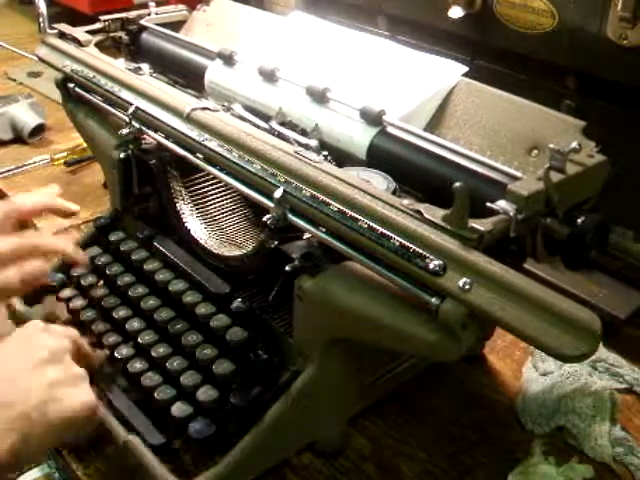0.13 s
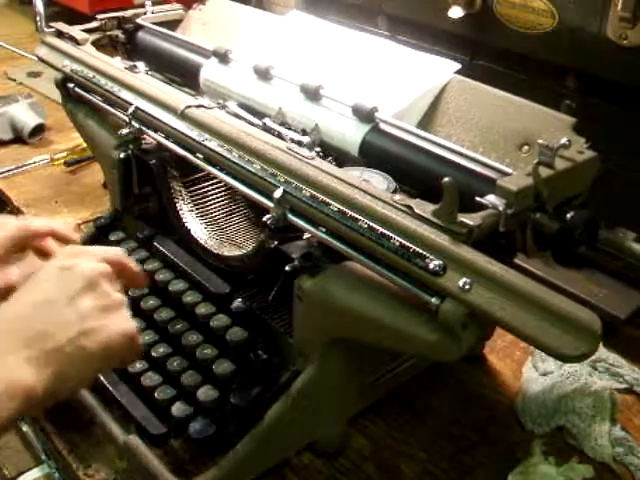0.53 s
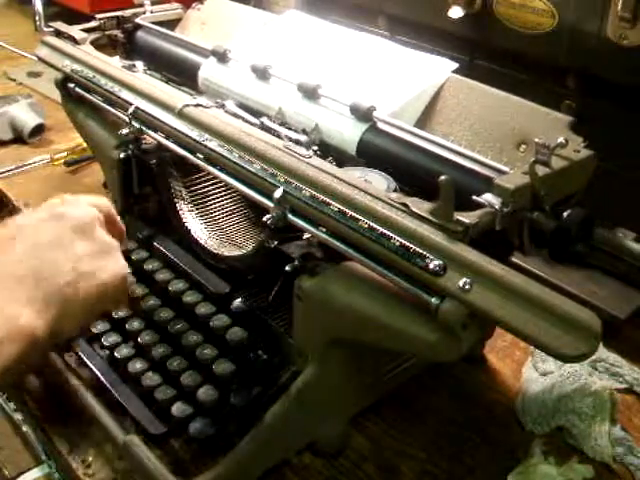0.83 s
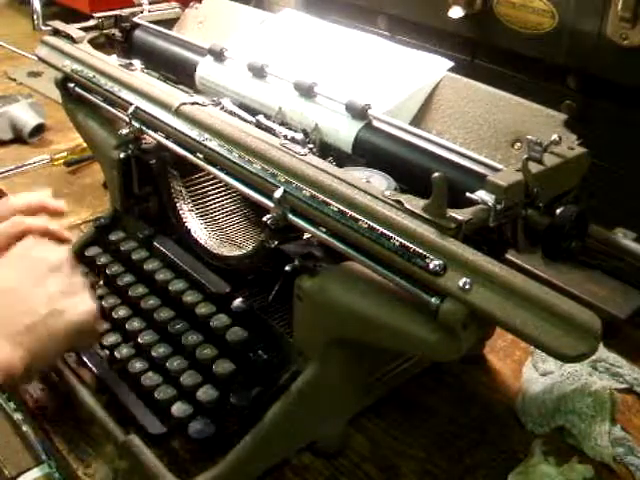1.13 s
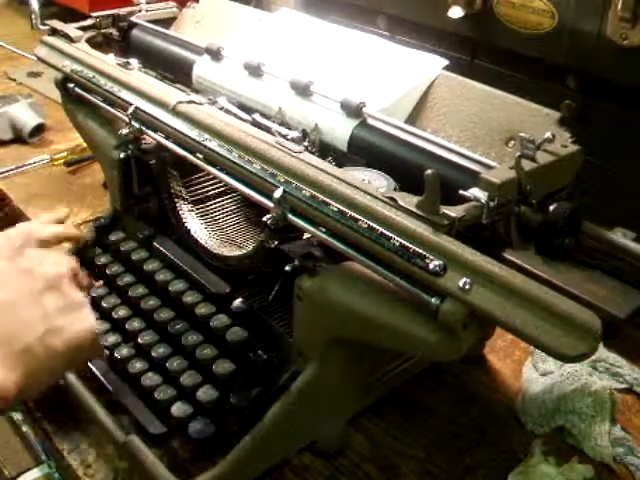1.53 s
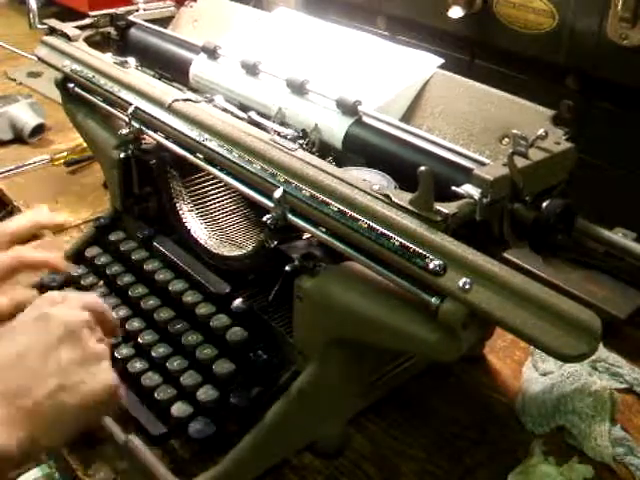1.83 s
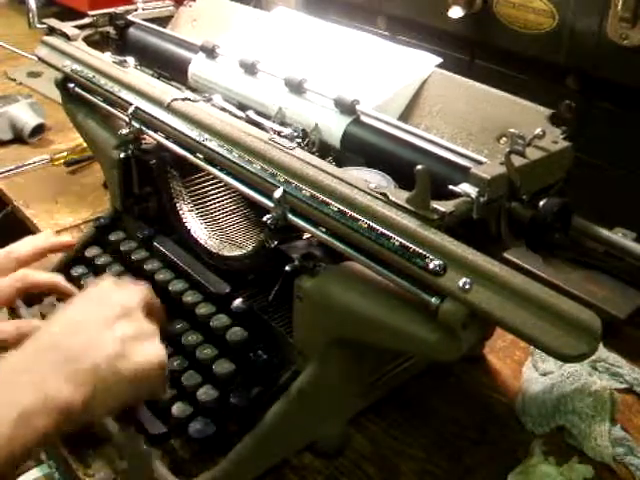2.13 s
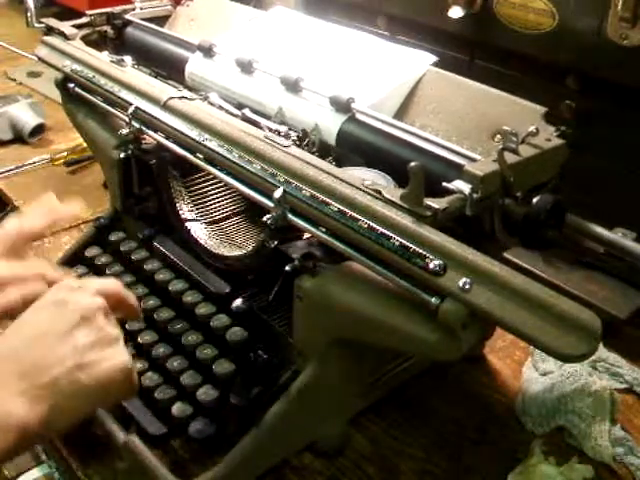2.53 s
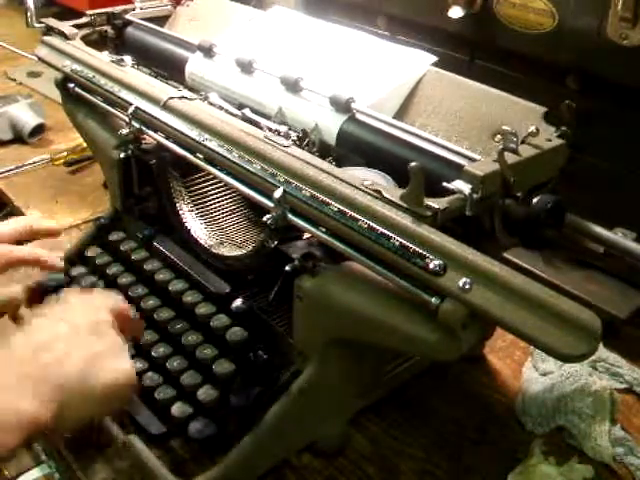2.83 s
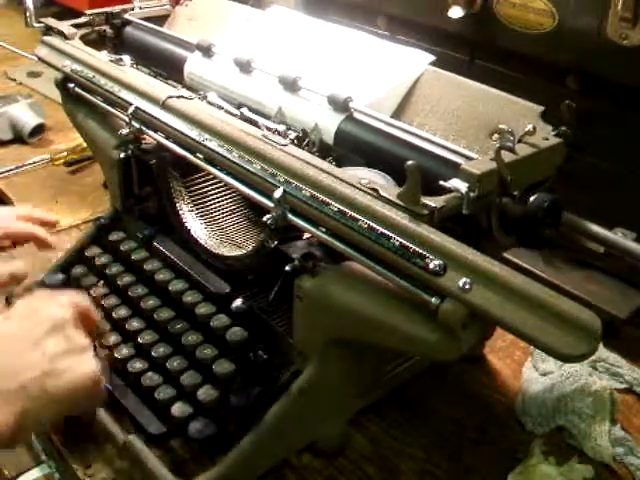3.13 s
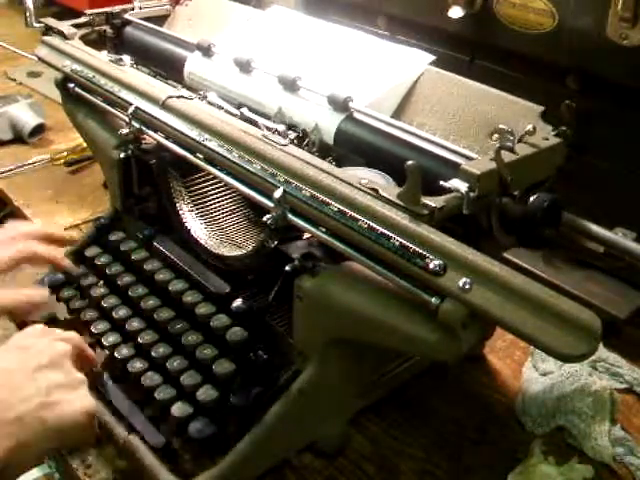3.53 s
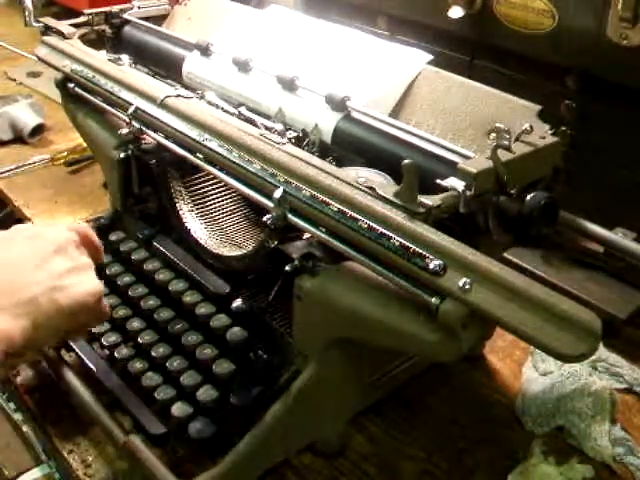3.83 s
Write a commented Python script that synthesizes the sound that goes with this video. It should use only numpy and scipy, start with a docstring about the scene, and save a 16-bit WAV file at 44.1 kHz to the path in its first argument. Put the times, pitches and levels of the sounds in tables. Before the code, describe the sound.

Heavy manual typewriter, heard close in a small room. Crisp cracks at about 0.1, 0.2, 0.55, 0.65, 0.9, 1.1, 1.25, 1.6, 1.75, 2.15, 2.35, 2.65 and 3.05 seconds, most preceded by a key click and followed by a release snap, rattle and short steel ring. Hollow thumps stand out near 0.35, 1.4 and 1.9. After 3.2 it rests; a thump and rattle come at 3.75. Faint hiss, hum and thin whine.

```python
"""Manual typewriter in a small room

Letters typed close by on a wooden bench: type bars scrape, crack on the platen and ring (noise, impulses, modes).
Key linkages click on press and the escapement snaps on release (coloured noise bursts); loose parts rattle.
The steel frame rings after the metal knocks; space bar and carriage thump the body (decaying modes).
The bench rumbles at each press (low noise); hiss, a faint hum and a whine (filtered noise) lie underneath."""
import sys
import numpy as np
from scipy import signal
from scipy.fft import rfft, irfft
from scipy.io import wavfile

SR = 44100
rng = np.random.default_rng(int(sys.argv[2]) if len(sys.argv) > 2 else 0)


def log_audio(samples):
    """Write samples as a 16-bit WAV file to the path given in sys.argv[1]."""
    # one column per channel
    frames = np.atleast_2d(samples).T
    # limit to full scale, then quantise
    limited = np.clip(frames, -1, 1)
    pcm = np.round(limited * 32767).astype(np.int16)
    wavfile.write(sys.argv[1], SR, pcm)


N = 176400
AGE = np.arange(16384) / SR  # time since onset [s]

# key goes down, linkage takes up the play:
# (time [s], snap level [dB], chatter level [dB], tilt [dB/octave], lever ring [Hz])
PRESSES = [(.086, -23, -21, 1, 7090), (.5105, -15, -21.5, 0, 4230), (0.6321, -22, -22.5, 0.5, 3840),
           (0.6441, -28, -20.5, -2.5, 4900), (0.8482, -40, -22, -0.5, 4000), (1.043, -21, -22, -1.5, 4350),
           (1.185, -26, -20.5, -1.5, 4760), (1.534, -12, -24, .5, 6900), (1.712, -15, -22.5, -2, 4220),
           (2.1013, -14, -22.5, -0.5, 3340), (2.3212, -18, -21.5, -1, 4000), (2.6016, -9.5, -22.5, 1, 7500),
           (3.0351, -16, -21.5, 0, 6940)]


def undb(db):
    """Decibels to gain."""
    return 10 ** (np.asarray(db) / 20)


def add(track, start_s, sound):
    """Mix a sound into the track at a time in seconds."""
    i = max(int(start_s * SR), 0)
    track[i:i + len(sound)] += sound[:N - i]


def colour(x, points, tilt=0, ring_hz=0, ring_db=0):
    """Minimum-phase filter of unit power through (Hz, dB) points; tilt [dB/octave] above 1024 Hz, one resonance."""
    ring_width_hz = 380
    size = len(x)
    hz, db = np.array(points).T
    f = np.fft.rfftfreq(size, 1 / SR)
    octave = np.log2(np.maximum(f, 1))
    resonance_db = ring_db / (1 + (2 * (f - ring_hz) / ring_width_hz) ** 2)
    curve_db = np.interp(octave, np.log2(hz), db)
    gain = undb(curve_db + tilt * np.maximum(octave, 10) + resonance_db)
    # fold the cepstrum to make the filter causal
    cepstrum = irfft(np.log(gain / np.sqrt(np.mean(gain ** 2))), size)
    cepstrum[1:size // 2] *= 2
    cepstrum[size // 2 + 1:] = 0
    return irfft(rfft(x) * np.exp(rfft(cepstrum)), size)


def chatter(decay_s, hold_s=0):
    """Dense tiny metal contacts: noise of uneven size that holds briefly, then decays exponentially."""
    uneven = .33  # log-normal spread, redrawn every 32 samples
    steps = np.repeat(rng.standard_normal(len(AGE) // 32), 32)
    size = np.exp(uneven * steps - uneven ** 2)
    envelope = np.exp(-np.maximum(AGE - hold_s, 0) / decay_s)
    return rng.standard_normal(len(AGE)) * size * envelope


def burst(decay_s, hold_s=0):
    """A short spell of chatter whose energy is set by its length alone."""
    x = chatter(decay_s, hold_s)
    return x * np.sqrt((abs(hold_s) + decay_s / 2) * SR / np.sum(x ** 2))


def mode(hz, t60_s):
    """One exponentially decaying vibration."""
    return np.cos(2 * np.pi * hz * AGE) * np.exp(-np.log(1000) * AGE / t60_s)


def background():
    """Coloured-noise hiss plus narrow noise bands, mostly levelled by their envelope, as hum and whine."""
    # hiss colour: (frequency [Hz], level [dB])
    air_colour = [(20, 10.5), (35, -17), (60, 3), (95, -11.5), (160, -4), (260, -12), (305, 4.5), (400, -1),
                  (600, -8), (1000, -10), (2000, -10.5), (3500, -16), (7500, -17), (8600, -30.5),
                  (10000, -47.5)]
    # steady room tones: (frequency [Hz], level [dB], width [Hz])
    hum_tones = [(32.2, -66.5, 6.7), (121.6, -58.5, 4.3), (210.1, -56, 13), (8100, -69, 190)]
    air_db, hum_steady = -48, .8  # hum_steady: 1 = constant envelope
    out = undb(air_db) * colour(rng.standard_normal(N), air_colour)
    f = np.fft.rfftfreq(N, 1 / SR)
    for hz, db, width_hz in hum_tones:
        spectrum = rfft(rng.standard_normal(N))
        tone = irfft(spectrum / (1 + (2 * (f - hz) / width_hz) ** 2), N)
        tone = tone / np.abs(signal.hilbert(tone)) ** hum_steady
        out += undb(db) * tone / np.std(tone)
    return out


def bench():
    """Each key press rocks the bench and leaves the body rumbling: decaying low noise."""
    # rumble colour: (frequency [Hz], level [dB])
    bump_colour = [(15, 10), (32, 11.5), (55, 0), (100, -10), (260, -4.5), (345, 11), (480, -18.5),
                   (900, -55)]
    bump_db, bump_decay_s = -51.5, .15
    out = np.zeros(N)
    for start_s, *_ in PRESSES:
        add(out, start_s, chatter(bump_decay_s))
    return undb(bump_db) * colour(out, bump_colour)


def thumps():
    """Cushioned blows of space bar and carriage swell the low modes of the body."""
    # blows: (time [s], level [dB], pitch [Hz])
    blows = [(.016, -29, 359), (0.097, -29.5, 345), (0.185, -25, 355), (.296, -28, 345), (0.339, -17, 353),
             (.449, -24, 357), (.611, -26, 361), (1.22, -29, 350), (1.409, -21.5, 349), (1.5, -26, 374),
             (1.521, -26.5, 357), (1.9136, -13.5, 351), (2, -28.5, 385), (2.032, -24.5, 343),
             (2.09, -31.5, 340), (2.148, -29, 350), (2.215, -29.5, 343), (2.371, -31, 385),
             (2.722, -23.5, 342), (3.7352, -16, 358), (3.809, -20.5, 389), (3.834, -21, 360)]
    # body modes: (ratio to blow pitch, level [dB], t60 [s])
    body_modes = [(.85, -18.5, 0.018), (1.001, 2, 0.056), (1.1, -9.5, 0.092), (1.288, -11.5, 0.061),
                  (1.55, -13, 0.034)]
    rise_s, detune = .004, .015
    swell = (1 - np.exp(-AGE / rise_s)) ** 2
    out = np.zeros(N)
    for start_s, db, hz in blows:
        ring = np.zeros(len(AGE))
        for ratio, mode_db, t60_s in body_modes:
            mode_hz = hz * ratio * (1 + detune * rng.standard_normal())
            ring += undb(mode_db) * mode(mode_hz, t60_s)
        add(out, start_s, undb(db) * ring * swell)
    return out


def rattles():
    """Type bars drop back and loose levers rattle: a short noise burst plus sparse decaying ticks."""
    # rattles: (time [s], level [dB])
    settlings = [(.002, -27.5), (0.044, -31), (.292, -30), (.408, -27.5), (.44, -33), (0.609, -32),
                 (.739, -33), (0.961, -34.5), (1.163, -35.5), (1.196, -27.5), (1.292, -35), (1.398, -29.5),
                 (1.406, -27), (1.414, -32), (1.493, -29.5), (1.522, -30.5), (1.631, -31.5), (1.824, -33),
                 (1.901, -30), (1.916, -28), (1.981, -35), (1.998, -31.5), (2.033, -30), (2.208, -32),
                 (2.435, -33), (2.739, -33), (3.141, -34), (3.726, -26.5), (3.805, -28.5), (3.837, -29.5)]
    # rattle colour: (frequency [Hz], level [dB])
    rattle_colour = [(100, 7), (650, -0.5), (1100, 2.5), (2300, 2), (3800, 5.5), (7600, 3.5), (8700, -6.5),
                     (10000, -30)]
    decay_s, ticks_per_s, tick_share = .018, 350, .5  # tick_share: share of energy
    out = np.zeros(N)
    for start_s, db in settlings:
        ticks = (rng.random(len(AGE)) < ticks_per_s / SR) * rng.choice([-1, 1], len(AGE))
        ticks = ticks * np.sqrt(SR / ticks_per_s) * np.exp(-AGE / decay_s)
        soft = np.sqrt(1 - tick_share) * burst(decay_s)
        add(out, start_s, undb(db) * (soft + np.sqrt(tick_share) * ticks))
    return colour(out, rattle_colour)


def clicks(events, chatter_decay_s):
    """A lever snaps against its stop and chatters there at its own pitch; its spring buzzes on without pitch."""
    # lever colour: (frequency [Hz], level [dB])
    lever_colour = [(100, -7.5), (750, -8.5), (1200, -5), (2500, 1), (4200, 3.5), (5800, 2.5), (7400, 5),
                    (8700, -3.5), (10000, -34.5)]
    snap_trim_db, snap_decay_s = -3.5, .0012
    chatter_hold_s, lever_ring_db = .0011, 7
    buzz_db, buzz_decay_s = -9.5, .015  # buzz_db: relative to chatter
    out = np.zeros(N)
    for start_s, snap_db, chatter_db, tilt, ring_hz in events:
        snap = undb(snap_db + snap_trim_db) * burst(snap_decay_s)
        contact = snap + undb(chatter_db) * burst(chatter_decay_s, chatter_hold_s)
        buzz = undb(chatter_db + buzz_db) * chatter(buzz_decay_s)
        pitched = colour(contact, lever_colour, tilt, ring_hz, lever_ring_db)
        add(out, start_s, pitched + colour(buzz, lever_colour, tilt))
    return out


def strikes():
    """The bar scrapes through its guide, cracks on the platen, rings, bounces once and shakes the basket."""
    # slug hits platen:
    # (time [s], crack level [dB], basket shudder level [dB], tilt [dB/octave], type bar ring [Hz])
    hits = [(.116, -3.5, -0.5, -0.5, 3980), (0.221, -4.5, 0, -1.5, 7200), (0.5417, -3.5, -1.5, 0, 3970),
            (.668, -4, -0.5, 4, 5270), (0.8763, 0, -4, 1, 5300), (1.0777, -5, 1, 1, 5290),
            (1.227, -4, .5, 1.5, 7340), (1.5743, -4.5, -.5, 0, 5200), (1.7486, -3.5, -1, 0.5, 5280),
            (2.1355, -3.5, -1.5, -.5, 3970), (2.3502, -1, -1.5, -1.5, 4050), (2.6366, -1, -2, -1.5, 4020),
            (3.062, -0.5, -4, 0.5, 6750)]
    # type bar and platen modes: (frequency [Hz], level [dB], t60 [s])
    platen_modes = [(1527, -23, 0.035), (2570, -7.5, 0.0074), (3194, -19.5, 0.029), (4120, -19.5, 0.031)]
    # crack colour: (frequency [Hz], level [dB])
    crack_colour = [(100, -20.5), (850, -21), (1500, -2), (2600, 1.5), (4200, 5.5), (7200, 3.5),
                    (8700, -2.5), (10500, -33)]
    # scrape and shudder colour: (frequency [Hz], level [dB])
    shudder_colour = [(100, -10.5), (750, -12), (1100, -7), (1600, -1.5), (2300, -7.5), (4200, -2.5),
                      (7200, -1.5), (8500, -9.5), (10000, -43)]
    grit_db, grit_decay_s, grit_hold_s = -15, .0013, .0019
    slug_db, bounce_s, bounce_db = 4, .0022, -9  # bounce_db: relative to slug
    platen_db, bar_ring_db = -4.5, 4.5
    guide_s, guide_rise_s, guide_db = .007, .0026, -22.5
    shudder_trim_db, shudder_decay_s = -31.5, .032
    clatter_db, clatter_decay_s = -33.5, .021
    ticks_per_s, tick_db = 150, -4
    out = np.zeros(N)
    for start_s, db, shudder_db, tilt, bar_hz in hits:
        blow = undb(grit_db) * burst(grit_decay_s, grit_hold_s)
        blow[0] += undb(slug_db)
        bounce = int(bounce_s * rng.uniform(.6, 1.2) * SR)
        blow[bounce] += undb(slug_db + bounce_db)
        ring = np.zeros(len(AGE))
        for hz, mode_db, t60_s in platen_modes:
            gain = undb(mode_db + platen_db + 2 * rng.standard_normal())
            ring += gain * mode(hz * (1 + .025 * rng.standard_normal()), t60_s)
        crack = colour(blow, crack_colour, tilt, bar_hz, bar_ring_db)
        add(out, start_s, undb(db) * (crack + ring))

        # the scrape ends at impact
        scrape = chatter(np.inf) * np.minimum(AGE / guide_rise_s, 1) * (AGE < guide_s)
        scrape = colour(scrape, shudder_colour, tilt=1.0)
        add(out, start_s - guide_s, undb(guide_db + shudder_db) * scrape)

        shake = undb(shudder_trim_db) * chatter(shudder_decay_s)
        shake += undb(clatter_db) * burst(clatter_decay_s)
        # neighbouring type bars tick against each other
        ticks = (rng.random(len(AGE)) < ticks_per_s / SR) * rng.uniform(-1, 1, len(AGE))
        ticks = ticks * np.exp(-AGE / shudder_decay_s)
        basket = colour(shake + undb(tick_db) * ticks, shudder_colour)
        add(out, start_s, undb(shudder_db) * basket)
    return out


def frame(x):
    """The steel frame rings on at its resonances: convolution with decaying modes."""
    # frame resonances: (frequency [Hz], gain [dB], t60 [s])
    frame_modes = [(331, 9, 0.13), (371.3, 11.5, 0.18), (457, 1, 0.31), (1190, 1, 0.24), (1424, -10, 0.14),
                   (1550, -4, 0.18), (1907, 1, 0.17), (2740, -7, 0.11), (4100, -11.5, 0.053),
                   (5120, -8, 0.09), (7050, -5.5, 0.11)]
    ring = np.zeros(len(AGE))
    for hz, db, t60_s in frame_modes:
        per_sample = 2 * np.log(1000) / (t60_s * SR)  # gain at resonance independent of t60
        ring += undb(db) * per_sample * mode(hz, t60_s)
    return signal.fftconvolve(x, ring)[:N]


def room(x):
    """Near surfaces answer with a short, dense noise tail whose fine pattern drifts slowly and steadily."""
    room_db, t60_s, rise_s, shifts_per_s = -12, .29, .0022, 1.1
    envelope = np.exp(-np.log(1000) * AGE / t60_s) * (1 - np.exp(-AGE / rise_s))
    out = np.zeros(N)
    # crossfade three tails at constant total power
    for k in range(3):
        walls = rng.standard_normal(len(AGE)) * envelope
        walls = walls / np.sqrt(np.sum(walls ** 2))
        phase = np.pi * (shifts_per_s * np.arange(N) / SR + k / 3)
        share = np.sqrt(2 / 3) * np.cos(phase)
        out += signal.fftconvolve(x * share, walls)[:N]
    return undb(room_db) * out


def scene():
    """Mix the machine, its frame, the bench and the room; the frame is driven by the metal sounds only."""
    # key comes up, escapement steps the carriage:
    # (time [s], snap level [dB], chatter level [dB], tilt [dB/octave], lever ring [Hz])
    releases = [(.1845, -9.5, -23, 2, 7200), (.3257, -38, -17, -2, 6000), (.7852, -19.5, -29, -3.5, 4370),
                (.9757, -11.5, -20, -1.5, 5770), (1.3178, -5.5, -23.5, 0, 4520),
                (1.6755, -16.5, -28.5, -3, 4420), (1.851, -17, -22, -1, 2430),
                (2.237, -22.5, -21.5, -3, 2860), (2.4535, -12.5, -20.5, -1, 3750),
                (2.7625, -10, -22.5, -1.5, 5200), (3.1597, -8.5, -20.5, -1, 5070),
                (3.163, -7.5, -29, 5.5, 7000), (3.733, -30, -20, -0.5, 4540)]
    levers_db = -3.5
    levers = clicks(PRESSES, chatter_decay_s=.008) + clicks(releases, chatter_decay_s=.0079) + rattles()
    metal = strikes() + undb(levers_db) * levers
    machine = metal + thumps()
    return (machine + frame(metal) + room(machine) + bench() + background())[None]


def lowpass(x, hz):
    """Steep elliptic low-pass: 0.2 dB ripple, 70 dB stopband."""
    return signal.sosfilt(signal.ellip(8, .2, 70, hz, fs=SR, output="sos"), x)


def record(dry):
    """The microphone loses the high treble, peaks saturate smoothly near the overload level, the top is cut."""
    mic_top_hz, top_hz, overload = 9700, 10500, .66
    x = lowpass(dry, mic_top_hz)
    saturated = x / (1 + (x / overload) ** 12) ** (1 / 12)
    return lowpass(saturated, top_hz)


dry = scene()
out = record(dry)
log_audio(out)
```